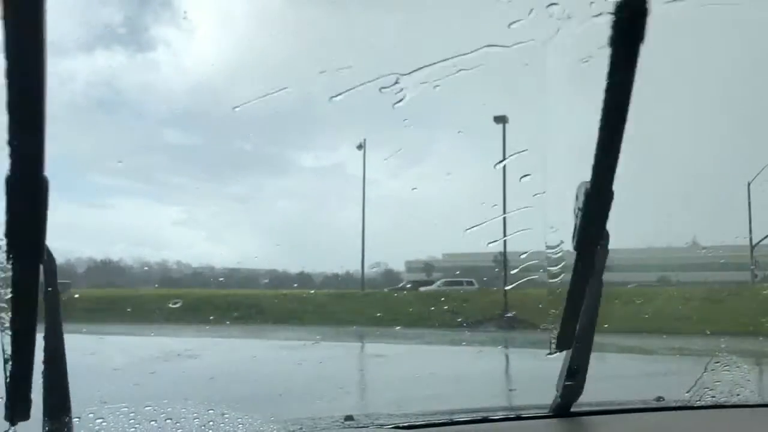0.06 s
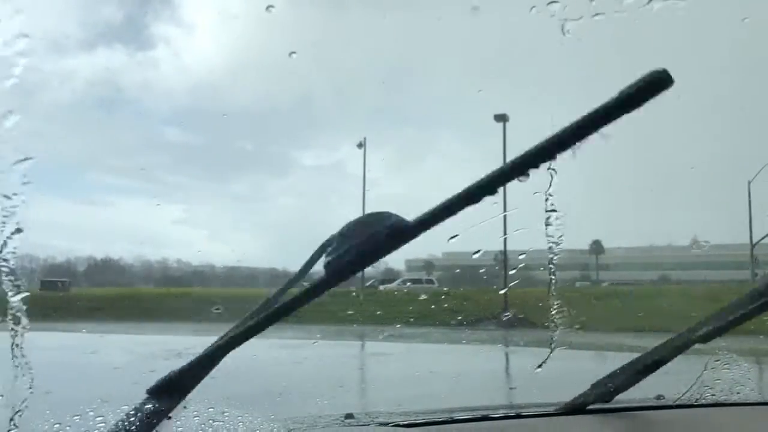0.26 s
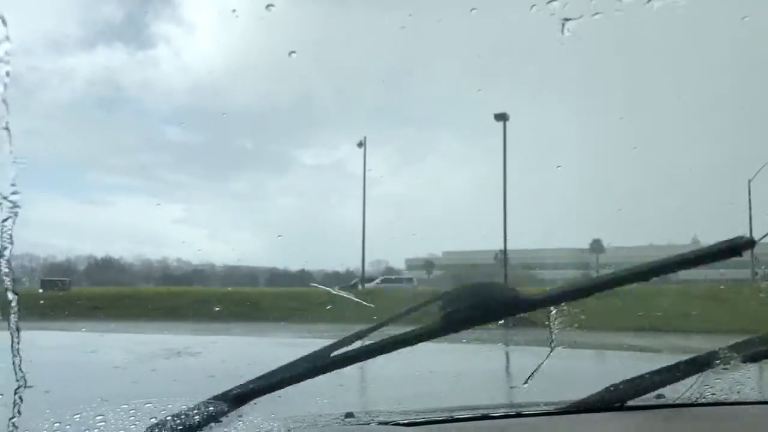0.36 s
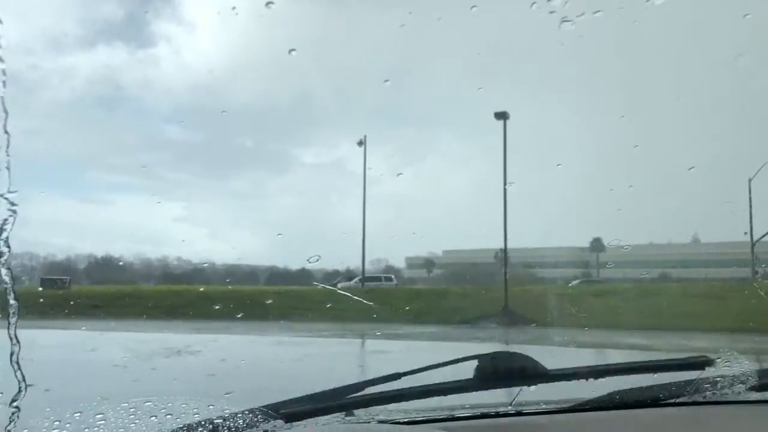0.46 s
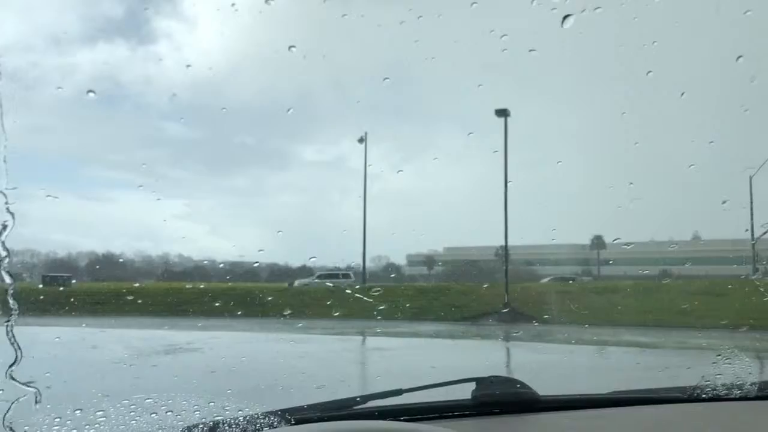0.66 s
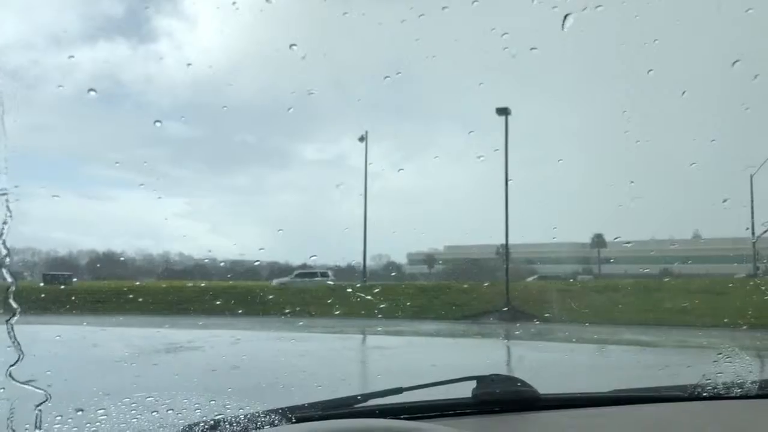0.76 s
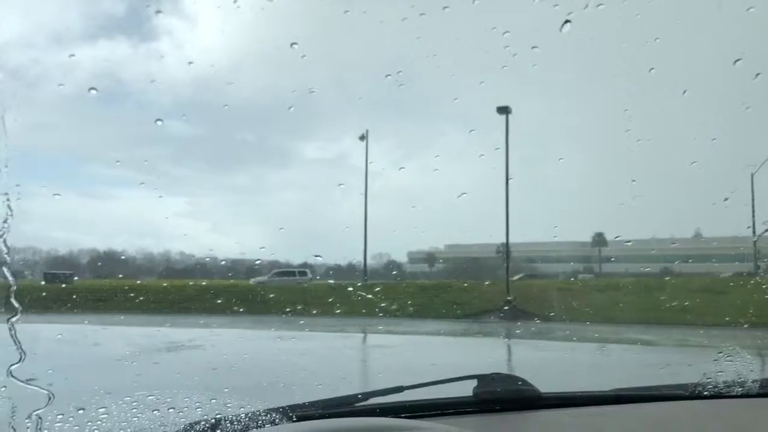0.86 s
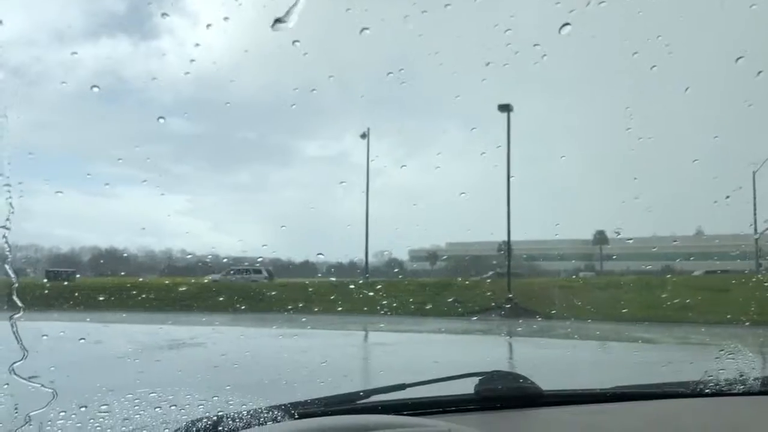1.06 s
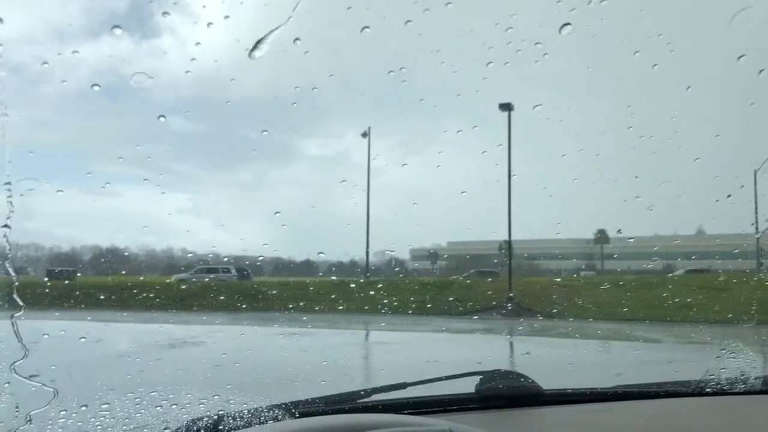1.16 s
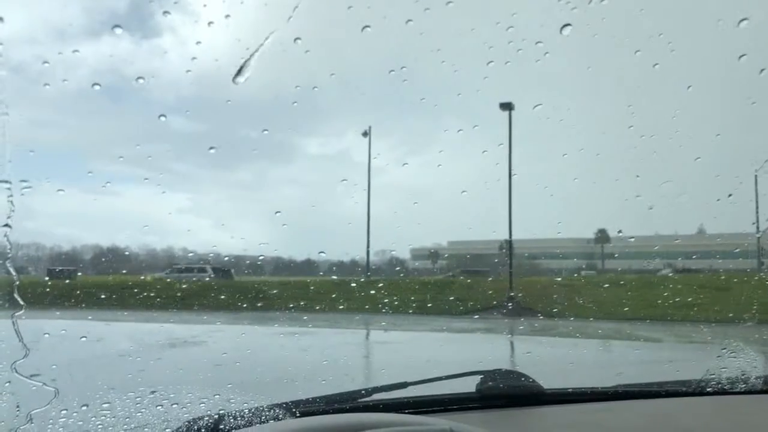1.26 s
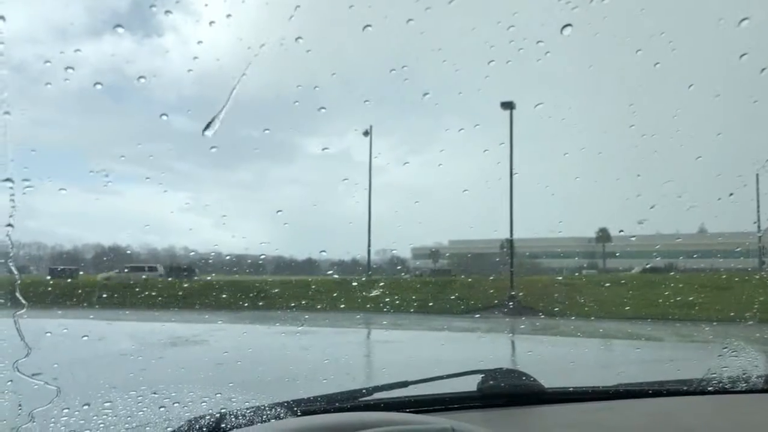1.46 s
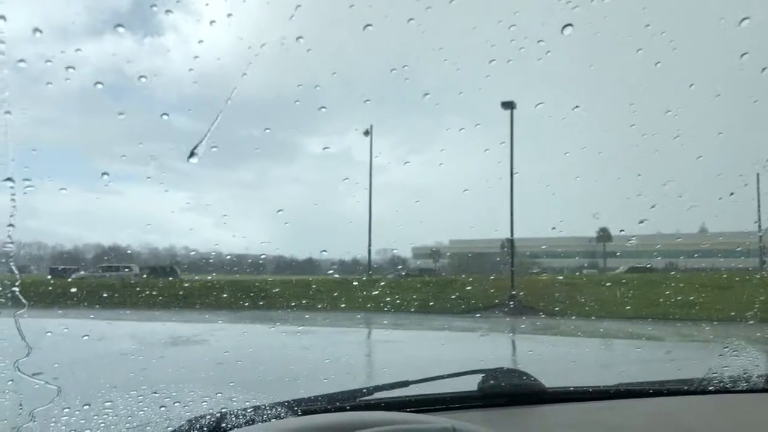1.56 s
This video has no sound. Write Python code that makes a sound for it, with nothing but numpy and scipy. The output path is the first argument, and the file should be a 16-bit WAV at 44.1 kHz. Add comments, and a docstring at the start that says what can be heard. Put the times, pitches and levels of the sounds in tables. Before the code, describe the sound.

Car wipers hum, thump and park, with rain ticking on the glass, heard from inside.

```python
"""Front seat of a car in the rain. Drops tick on the windshield and ring the glass; fine spray hisses.
On the roof and bonnet they drum more dully, muffled by the lining. The wiper motor hums, the rubber
blades swish, thump at the bottom of their stroke and knock once more as they park, each blow booming
in the body. A low rumble fills the cabin."""
import sys
import numpy as np
from scipy import signal
from scipy.fft import rfft, irfft
from scipy.io import wavfile

SR = 44100
rng = np.random.default_rng(int(sys.argv[2]) if len(sys.argv) > 2 else 0)


def pcm_store(signal):
    """Save signal as 16-bit PCM."""
    levels = np.round(np.clip(np.atleast_2d(signal), -1, 1) * 32767)
    wavfile.write(sys.argv[1], SR, levels.astype(np.int16).T)


N = 70560
TIME_S = np.arange(N) / SR


def from_db(db):
    """Decibels to gain."""
    return 10 ** (np.asarray(db) / 20)


def unit_rms(x):
    """Scale to unit power."""
    return x / np.sqrt(np.mean(x ** 2) + 1e-20)


def gain_curve(points):
    """Gain over time from (time_s, level_db) points."""
    return from_db(np.interp(TIME_S, *np.transpose(points)))


def band(x, low_hz, high_hz, order=2):
    """Butterworth band-pass."""
    sos = signal.butter(order, [low_hz, high_hz], "band", fs=SR, output="sos")
    return signal.sosfilt(sos, x + 1e-18)


def drift(rate_hz):
    """Slow random wander, unit RMS."""
    hz = np.arange(N + 1) * SR / (2 * N)
    spectrum = rfft(rng.standard_normal(2 * N)) / (1 + (hz / rate_hz) ** 2)
    return unit_rms(irfft(spectrum)[:N])


def colour(x, spectrum):
    """Minimum-phase filter through (freq_hz, gain_db) points; output at unit RMS."""
    hz, db = np.transpose(spectrum)
    grid_hz = np.maximum(np.arange(N // 2 + 1) * SR / N, 1)
    skirts = (1 + (hz[0] / grid_hz) ** 4) * (1 + (grid_hz / hz[-1]) ** 4)
    magnitude = from_db(np.interp(np.log(grid_hz), np.log(hz), db)) / np.sqrt(skirts)
    cepstrum = irfft(np.log(magnitude))
    response = np.exp(rfft(2 * cepstrum[:N // 2], N))
    return unit_rms(irfft(rfft(x) * response))


def impacts(per_s, spread_db):
    """Clicks at random moments, many small and few large."""
    sizes = from_db(spread_db * np.minimum(rng.exponential(1, N), 4))
    return (rng.random(N) < per_s / SR) * sizes * rng.choice([-1, 1], N)


def hum(pitch_hz, wander, flutter_db):
    """Tone of unit RMS, unsteady in pitch and level."""
    phase = 2 * np.pi * np.cumsum(pitch_hz * (1 + wander * drift(rate_hz=11.6))) / SR
    return unit_rms(np.sin(phase) * from_db(flutter_db * drift(rate_hz=11)))


def swell(start_s, swell_s):
    """Envelope that peaks at 1 after swell_s, then dies away on the same time scale."""
    age = np.maximum(TIME_S - start_s, 0) / swell_s
    return age * np.exp(1 - age)


def boom(start_s, pitch_hz, swell_s):
    """One mode swelling and dying after a blow."""
    return swell(start_s, swell_s) * np.sin(2 * np.pi * pitch_hz * (TIME_S - start_s))


def cabin_rumble():
    """The car's low rumble and drone."""
    # Rumble spectrum: freq_hz, gain_db
    spectrum = [(40, -17.5), (50, 0), (75, -4), (115, -2), (170, -3.5), (260, -7), (450, -16.5)]
    rumble = from_db(-45) * colour(rng.standard_normal(N), spectrum)
    drone = from_db(-48) * hum(pitch_hz=47.5, wander=0.073, flutter_db=1.8)
    return rumble + drone


def spray():
    """Countless tiny drops merge into a grainy hiss on the glass."""
    # Spray strength: time_s, relative_db
    strength = [(0, -45.5), (.1, -54.5), (.22, -59.5), (.27, -52), (.42, -60), (.48, -54), (.58, -53),
                (.64, -50.5), (.695, -45), (.74, -54.5), (.81, -46), (.95, -60.5), (1.14, -54),
                (1.23, -52.5), (1.42, -49), (1.6, -45.5)]
    # Hiss spectrum: freq_hz, gain_db
    spectrum = [(1000, -10), (2100, 4.5), (3200, 7), (4200, 1.5), (6000, -9), (9000, -14.5), (12000, -25),
                (16000, -11)]
    drops = impacts(per_s=9000, spread_db=1.5)
    return from_db(-2) * gain_curve(strength) * colour(drops, spectrum)


def roof_rain():
    """Dense drops on the sheet metal, muffled by the lining, swelling with the gusts."""
    # Rain strength on roof and bonnet: time_s, relative_db
    gusts = [(0, -45.5), (.11, -47), (.235, -42.5), (.28, -45.5), (.42, -44.5), (.54, -44.5), (.62, -46),
             (.7, -41), (.8, -45), (.88, -44.5), (.95, -48), (1.12, -46.5), (1.27, -45.5), (1.36, -41),
             (1.46, -44), (1.51, -41.5), (1.6, -41)]
    # Lined sheet metal response: freq_hz, gain_db
    spectrum = [(130, 10.5), (200, -0.5), (300, 2.5), (450, 0), (650, 0), (950, -0.5), (1250, -4.5),
                (1600, -3.5), (2100, -13.5), (3200, -23), (6000, -27)]
    drops = impacts(per_s=2500, spread_db=2)
    return from_db(2.5) * gain_curve(gusts) * colour(drops, spectrum)


def roof_taps():
    """Fat drops ring the roof panel, each with its own mix of the modes."""
    # Fat drops: start_s, level_db
    taps = [(1.327, -44), (1.357, -43.5), (1.408, -41.5), (1.432, -46), (1.495, -36.5), (1.516, -43),
            (1.532, -44.5), (1.563, -45)]
    # Roof panel modes: pitch_hz, gain_db, swell_s
    modes = [(151, -8, .01), (197, -3.5, .012), (364, -6, .008), (432, -1.5, 0.0079), (600, 1, 0.0091),
             (666, -0.5, 0.0031), (1016, -4, 0.0059), (1477, -6, 0.0041)]
    out = np.zeros(N)
    for start_s, level_db in taps:
        for pitch_hz, gain_db, swell_s in modes:
            gain = rng.standard_normal() * from_db(level_db + gain_db)
            out += gain * boom(start_s, pitch_hz, swell_s)
    return out


def windshield_drops(ring_t60_s=0.031):
    """Each drop gives a sharp tick, then a short diffuse ring that differs wherever it lands."""
    # Big drops, a square hit ticking harder: start_s, relative_db, extra_tick_db
    big_drops = [(0.163, -6, -9), (0.194, -4, -8), (0.2765, -11, -3), (0.2995, -11, 13), (0.3268, -4, 2),
                 (0.3602, -13, 11), (0.391, -10, -3), (0.4615, -7.5, 6.5), (0.467, -7.5, 1),
                 (0.6757, -7, 8), (0.6912, -2, 7), (0.694, -9, -6), (0.7868, -13, 10), (1.0677, -11.5, 12),
                 (1.091, -4, -6), (1.130, -9, 4), (1.138, -1, 1), (1.1495, -5, 5), (1.221, -5.5, -8),
                 (1.281, -1, -4), (1.2985, -12, 12), (1.324, -0.5, -9), (1.381, -3, 1), (1.4223, -2, 6.5),
                 (1.441, -3, -1), (1.495, -1.5, -3)]
    # Ring of glass and cabin: freq_hz, gain_db
    ring_spectrum = [(1200, -1.5), (2200, 2), (3200, 4), (4400, -3.5), (6000, -6.5), (9000, -15.5),
                     (12000, -23.5), (16000, -23.5)]
    small_drops = from_db(-44.5) * impacts(per_s=420, spread_db=3)
    ticks, blows = small_drops.copy(), small_drops.copy()
    for start_s, relative_db, extra_tick_db in big_drops:
        size = from_db(relative_db - 23)
        blows[int(start_s * SR)] += size
        ticks[int(start_s * SR)] += size * from_db(extra_tick_db)
    energy_retained = 1e-6 ** (1 / (ring_t60_s * SR))  # per sample
    energy = signal.lfilter([1], [1, -energy_retained], blows ** 2 + 1e-18)
    rings = colour(np.sqrt(energy) * rng.standard_normal(N), ring_spectrum)
    return from_db(-53) * rings + from_db(-3) * band(ticks, low_hz=2200, high_hz=8900, order=1)


def wiper_motor():
    """A wavering hum with the low rattle of the linkage, fading once the blades are down."""
    # Motor loudness: time_s, level_db
    loudness = [(0, -49), (.06, -43), (.18, -38), (.28, -38), (.41, -38.5), (.45, -50.5), (.53, -42),
                (.6, -66), (.73, -43.5), (.8, -43), (.92, -61), (1.6, -80)]
    rattle = unit_rms(band(rng.standard_normal(N), low_hz=101, high_hz=280))
    tone = hum(pitch_hz=116.6, wander=0.0635, flutter_db=3)
    return gain_curve(loudness) * unit_rms(tone + from_db(-4) * rattle)


def swishes_and_park_tick():
    """Wet swishes and slaps of the blades, and a thin high tick as the wipers park."""
    # Noise bursts, the park tick last: start_s, level_db, swell_s, low_hz, high_hz
    bursts = [(0.21, -46, 0.011, 930, 2430), (0.3004, -37.5, 0.0011, 2310, 5900),
              (0.375, -48, 0.0072, 1190, 3340), (0.838, -55.5, 0.0021, 9700, 10900)]
    out = np.zeros(N)
    for start_s, level_db, swell_s, low_hz, high_hz in bursts:
        hiss = unit_rms(band(rng.standard_normal(N), low_hz, high_hz))
        out += from_db(level_db) * swell(start_s, swell_s) * hiss
    return out


def wiper_knocks():
    """Each knock sets the body's modes booming; a soft contact spares the high ones."""
    # Knocks, pitched by where they land: start_s, level_db, hardness_hz, pitch_ratio
    knocks = [(0.2095, -34.5, 790, 0.95), (0.2125, -27, 150.9, 1.11), (0.2243, -29.5, 332, 0.91),
              (0.3018, -29, 1037, 0.92), (0.3059, -1.5, 89.2, 0.99), (0.3073, -30.5, 890, 1.006),
              (0.341, -15, 102, 0.85), (0.3784, -26.5, 129, 1.02), (0.8219, -28.5, 276, 1.09),
              (0.8359, -25, 460, 1.03), (0.837, -16.5, 97, 0.77), (0.8488, -27.5, 416, 1.1),
              (0.8673, -34.5, 360, 0.89)]
    # Body and cabin modes: mode_hz, gain_db, swell_s
    modes = [(62, -25, 0.015), (112.8, -16.5, 0.023), (163.2, 1.5, 0.0052), (198, -5.5, 0.013),
             (262, -1, 0.0028), (417, -12, 0.005), (480, -7.5, .0051), (658, -12, 0.0056),
             (823, -6.5, 0.0031)]
    out = np.zeros(N)
    for start_s, level_db, hardness_hz, pitch_ratio in knocks:
        for k, (mode_hz, gain_db, swell_s) in enumerate(modes):
            contact_lowpass = 1 / np.sqrt(1 + (mode_hz / hardness_hz) ** 4)
            gain = (-1) ** k * from_db(level_db + gain_db) * contact_lowpass
            out += gain * boom(start_s, mode_hz * pitch_ratio, swell_s)
    return out


def scene():
    """Rain, wipers and rumble at the front seat, mono."""
    rain = windshield_drops() + roof_rain() + spray() + roof_taps()
    wipers = wiper_knocks() + swishes_and_park_tick() + wiper_motor()
    return (rain + wipers + cabin_rumble())[None]


def record(dry):
    """Steep cut of the top treble."""
    cutoff_hz = 15800
    return signal.sosfilt(signal.ellip(12, .1, 90, cutoff_hz, fs=SR, output="sos"), dry)


dry = scene()
out = record(dry)
pcm_store(out)
```